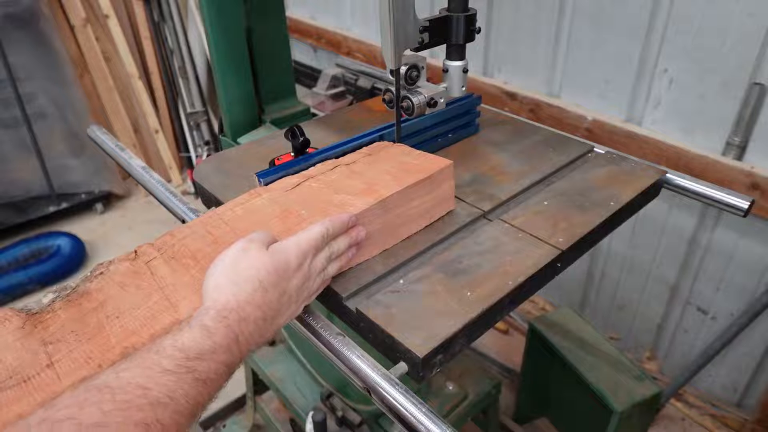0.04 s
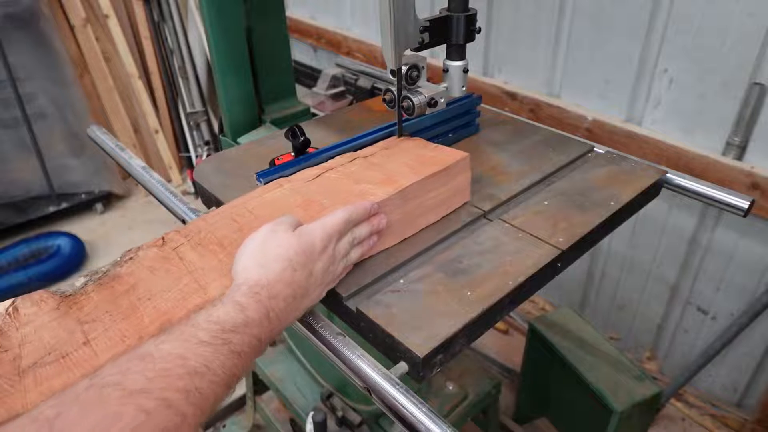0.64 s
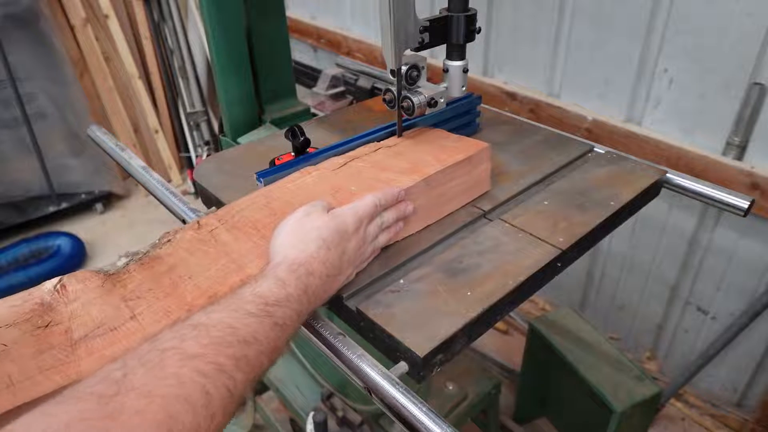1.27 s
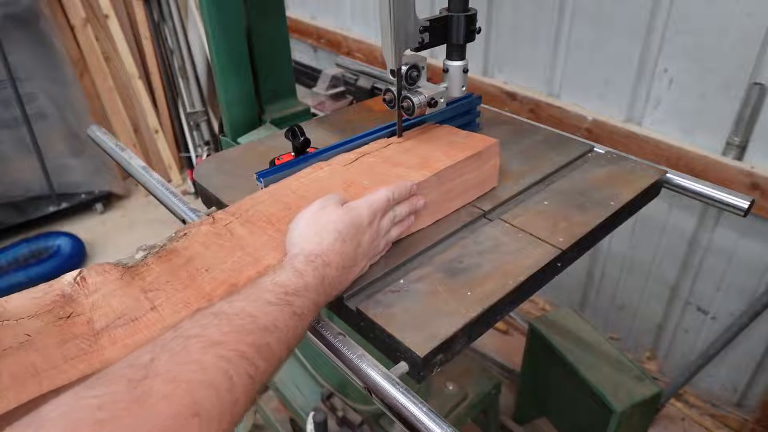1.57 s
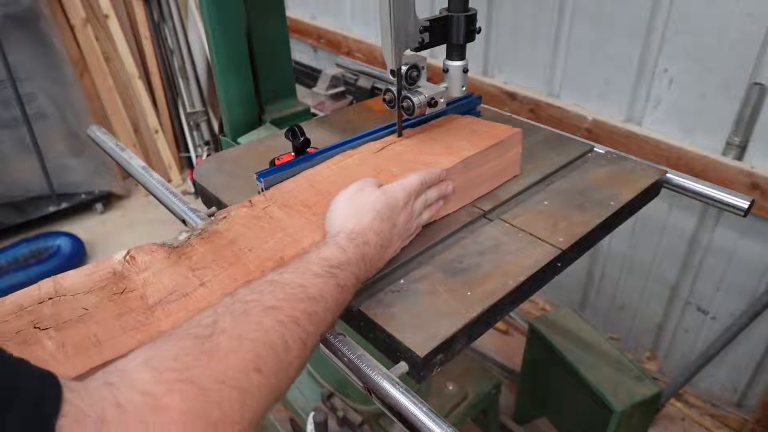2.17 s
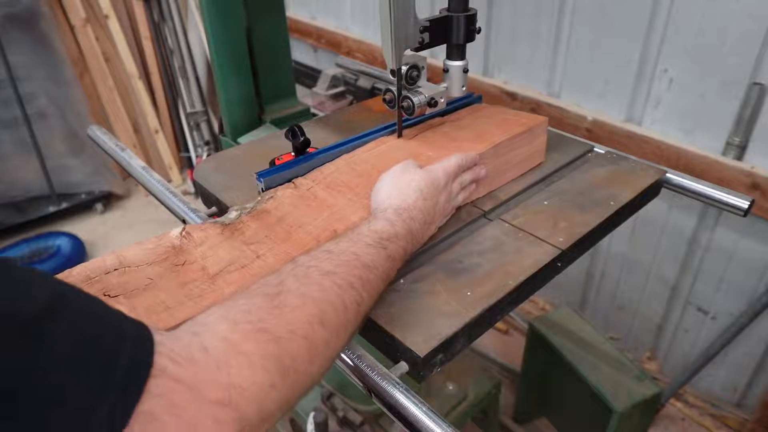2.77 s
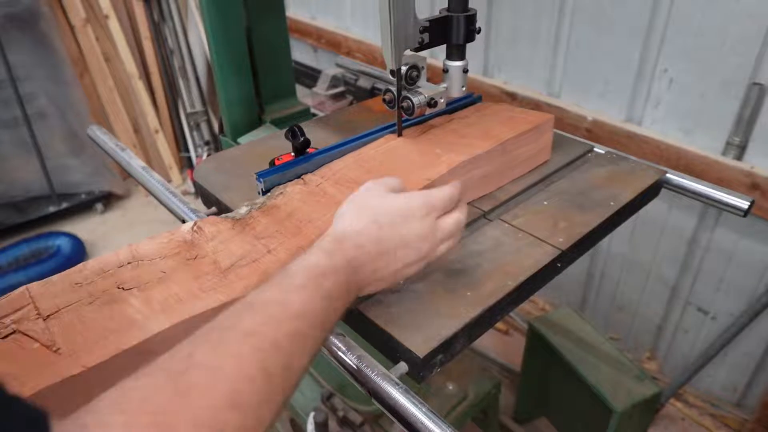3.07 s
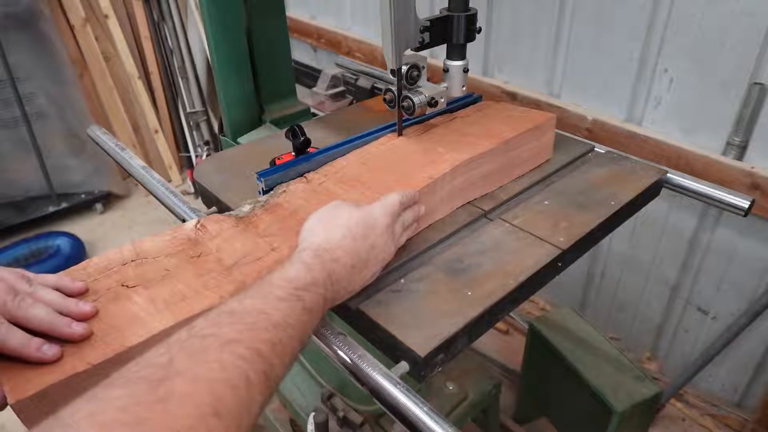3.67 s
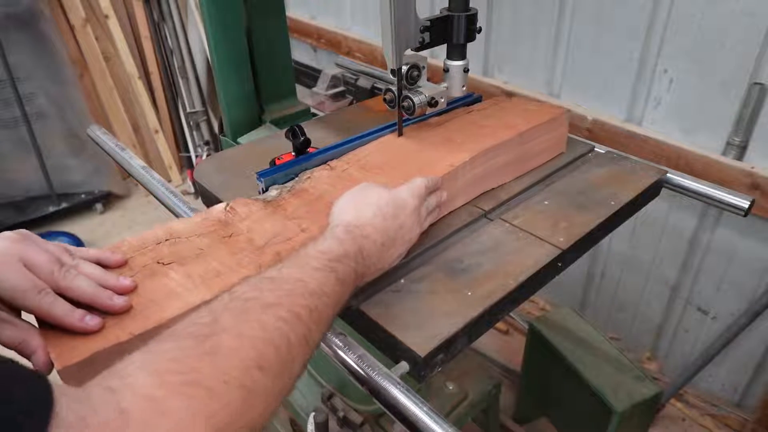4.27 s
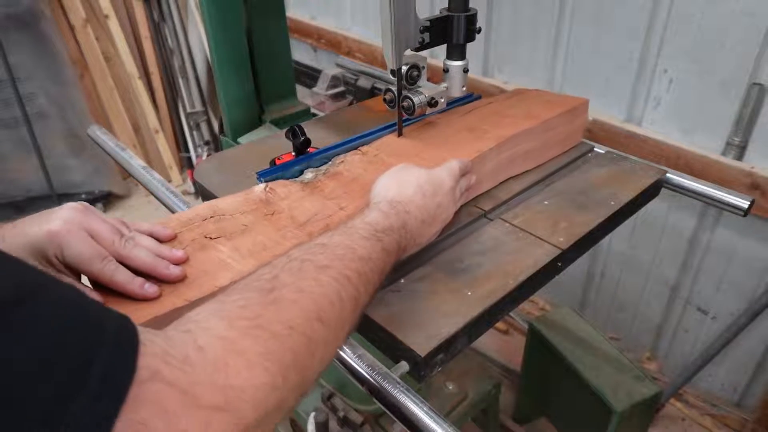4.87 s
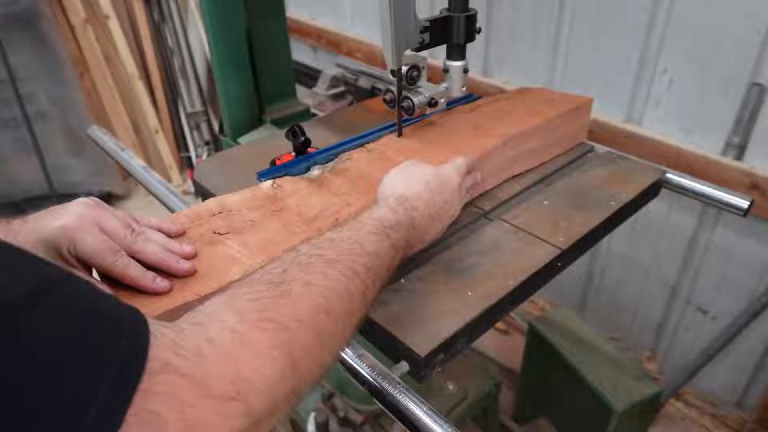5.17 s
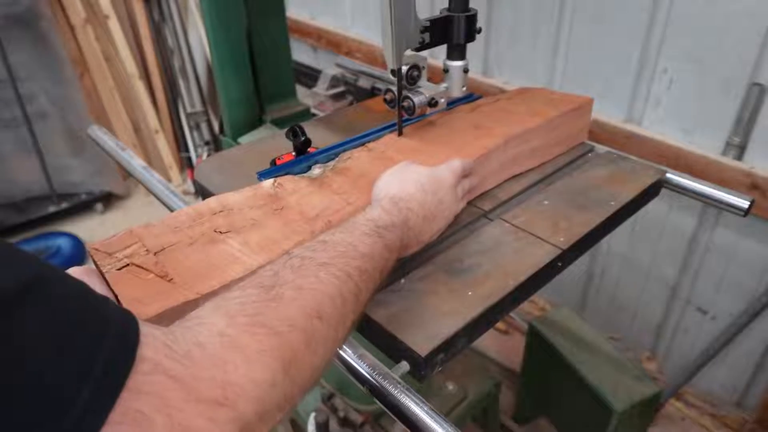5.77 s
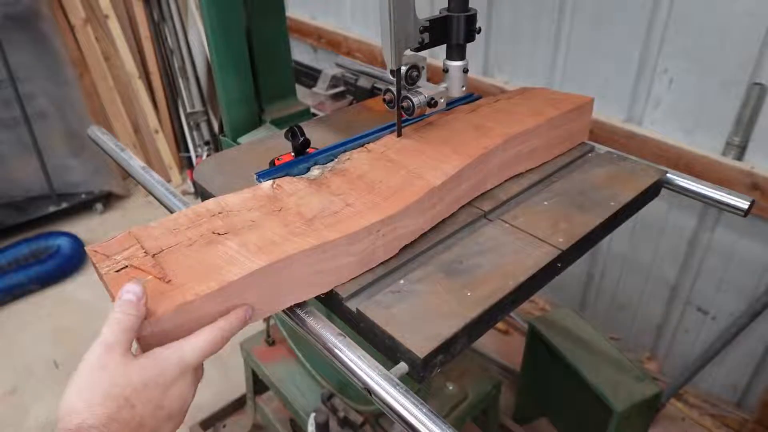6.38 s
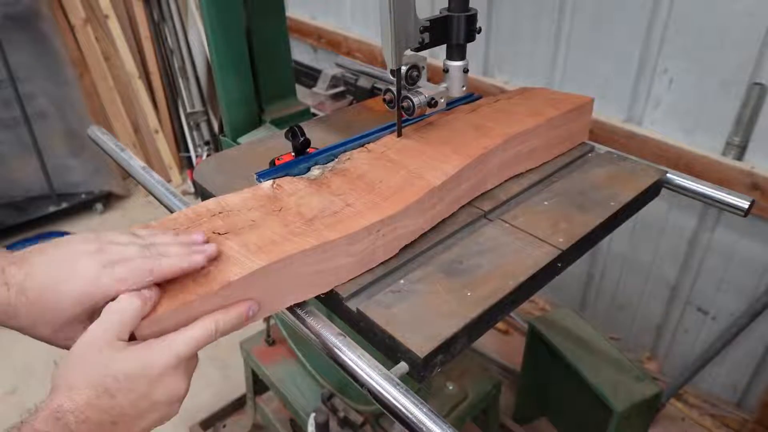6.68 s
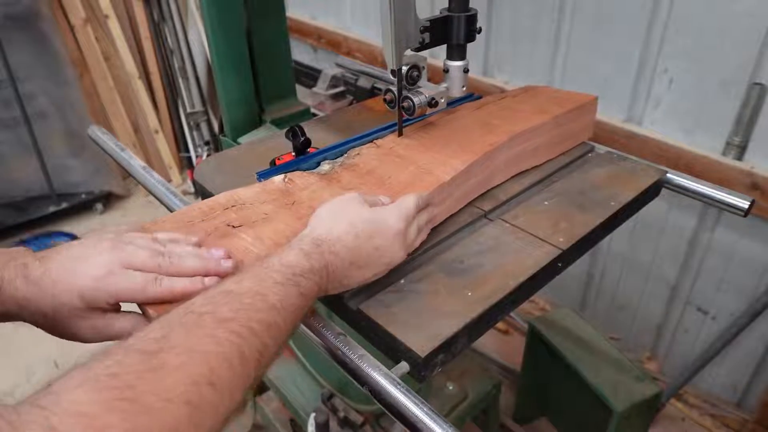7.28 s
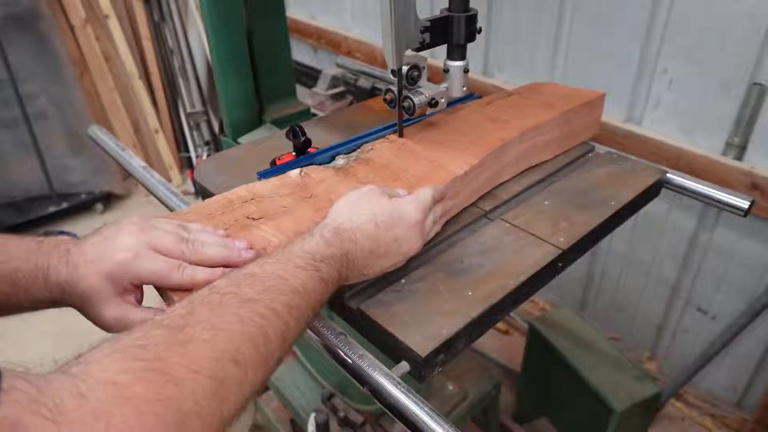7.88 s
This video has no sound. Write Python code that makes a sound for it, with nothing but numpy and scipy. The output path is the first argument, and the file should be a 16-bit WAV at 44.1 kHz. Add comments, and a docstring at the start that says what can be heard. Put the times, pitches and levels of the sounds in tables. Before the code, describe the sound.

Close, rasping noise of a bandsaw cutting thick wood in a small workshop, broken by bouts of shrill blade squeal.

```python
"""Bandsaw ripping a thick board

In a small workshop, the teeth tear out chips and ring blade and frame over the hum of motor and wheels.
In the tight kerf (the slot it cuts) the blade breaks into bouts of throbbing whine, and at times it
sings on overtones of the tooth rate. An automatic gain control holds the level of the mono sound,
so the noise of the cut sinks when the blade whines loudly."""
import sys
import numpy as np
from scipy import signal
from scipy.fft import rfft, irfft, next_fast_len
from scipy.io import wavfile
from scipy.ndimage import uniform_filter1d, minimum_filter1d, map_coordinates

SR = 44100
rng = np.random.default_rng(int(sys.argv[2]) if len(sys.argv) > 2 else 0)


def wrap_up_sound(samples):
    """Save the sound to the file named by the first command line argument, as 16-bit audio."""
    columns = np.atleast_2d(samples).T
    # keep every value between -1 and 1, then stretch to whole-number steps
    tamed = np.clip(columns, -1, 1)
    steps = np.round(tamed * 32767).astype(np.int16)
    wavfile.write(sys.argv[1], SR, steps)


N = 354123
TIME = np.arange(N) / SR

# Levels in the tables are relative. A swell is the change in level from start to end.
# the cut as the board is fed: t/s, growl of board and frame/dB, rasp of teeth/dB, hiss of sawdust/dB
FEED_LEVELS = [(.1, -14, -20.5, -21.5), (.55, -17, -17, -23.5), (1.2, -14, -18, -21),
               (1.4, -19.5, -17, -27.5), (1.85, -15, -17.5, -22), (2.2, -17.5, -18.5, -23),
               (2.55, -15, -17, -21.5), (3.1, -18.5, -23, -27), (3.5, -16, -21.5, -26.5),
               (3.72, -20, -24, -30), (3.82, -15.5, -20, -26.5), (4.85, -16.5, -19.5, -26.5),
               (5.28, -16.5, -22.5, -27), (5.5, -16, -22, -26), (6.55, -13.5, -20.5, -24.5),
               (7.1, -15.5, -19.5, -25.5), (7.85, -17, -25, -27.5), (8.0, -18, -20, -22.5)]
# tone colour of tearing wood: f/Hz, level/dB
WOOD_COLOUR = [(150, -33.5), (300, -23), (420, -16.5), (610, -14), (800, -1), (1150, -5.5), (1400, -0.5),
               (1850, -4.5), (2500, -2.5), (3500, -6), (6000, -9.5), (7700, -13.5), (10500, -13.5),
               (15600, -20)]
# modes (natural ringing pitches) of blade and frame: f/Hz, width/Hz, level/dB
STEEL_MODES = [(782, 25, 2), (840, 40, 2), (1077, 22, 7), (1336, 32, 14), (1378, 26, 8), (1513, 32, 7),
               (2128, 30, 9), (2820, 110, -4), (3150, 30, -1), (3890, 100, -4), (4265, 55, 5),
               (4690, 90, -4), (5075, 25, 0), (5630, 55, 5), (6095, 40, -4), (7060, 50, -7),
               (9140, 130, -10), (14200, 70, -10)]
# the teeth bite harder or softer for a moment: t/s, change/dB
TOOTH_BITES = [(.87, 1.5), (3.63, 2), (5.08, 0.5), (5.43, 4.5), (5.87, 4.5), (6.72, -2.5), (7.69, 3.5)]
# bouts of whine: start/s, end/s, level/dB, swell/dB, f/Hz, glide/Hz, extra pitch at the start/Hz,
# raggedness from 0 to 1, level of the shrill third harmonic/dB
WHINE_BOUTS = [(.24, 1.263, -8.5, 0.5, 3445, -0.5, 220, 0.92, -17.5),
               (1.259, 2.566, -20.5, -9, 3425, -60, 30.5, 0.92, -20),
               (1.94, 2.06, -23, -3, 3397, -0.5, 0, 0.68, -20),
               (2.23, 2.392, -20.5, 2, 3370, -1, 0, .85, -20),
               (2.568, 3.03, -7.5, 2.5, 3457, 81.5, -0.5, 0.78, -14),
               (3.03, 3.153, -14, -15, 3600, 220, 0, 1, -17),
               (3.424, 3.48, -21, 0, 3673, -3, 2.5, 0.85, -18),
               (3.554, 3.615, -10, -5, 3525, 4, 50, 0.82, -12),
               (3.887, 3.943, -3, -13, 3460, 7, 40, 0.43, -14.5),
               (3.988, 4.05, -6.5, -3, 3427, -6, 41, 0.98, -12),
               (4.058, 4.377, -6.5, -8, 3460, 33.5, 2.5, 0.67, -14.5),
               (4.388, 4.54, -5.5, -2, 3442, -22.5, 30, 0.41, -11),
               (4.548, 5.08, -12, -6.5, 3455, -19, -1, .48, -11),
               (6.856, 6.903, -22, -2, 3520, -6, 49.5, .9, -20),
               (6.944, 7.11, -14, 4, 3486, -1, 40.5, 0.84, -18),
               (7.334, 7.619, -19.5, -9, 3488, 1, 28.5, 0.88, -17)]
# the blade slows briefly in hard wood: t/s, drop in tooth rate/Hz
SLOWDOWNS = [(1.02, 14.3), (1.98, 32), (2.32, 17)]
# the blade sings: start/s, end/s, multiple of the tooth rate, level/dB, swell/dB
SONG_BOUTS = [(0.14, 0.3, 3, -24.5, 12), (0.35, 1.13, 3, -22, 5), (1.24, 1.99, 3, -15.5, -0.5),
              (2.33, 2.63, 3, -20, 3), (1.28, 2.03, 4, -29, -4), (5.35, 5.5, 4, -26, 0),
              (5.83, 6.07, 4, -23, -2), (0.96, 0.99, 6, -23, 0), (1.15, 1.5, 6, -39, 0),
              (2.41, 2.79, 6, -22.5, -2), (0.58, 1.48, 9, -33, 3), (1.73, 2.6, 9, -35, -1)]
# tones that sound together in a song on multiple 3: multiple of the tooth rate, level/dB
SONG_OVERTONES = [(3, 1.5), (4, -24), (5, -18), (7, -18), (9, -20)]
# the sides of the teeth scrape the kerf: start/s, end/s, level/dB, swell/dB
SCRAPE_BOUTS = [(1.25, 2.04, -22, 5), (2.22, 2.415, -25.5, -10), (4.07, 5.08, -23.5, 4),
                (6.85, 7.113, -21, 8), (7.33, 7.619, -23, -3)]
# blade modes that the scraping rings: f/Hz, width/Hz, level/dB
SCREECH_MODES = [(4250, 110, -6), (4980, 200, -6), (5500, 300, 0), (6300, 220, -9), (6930, 220, -2),
                 (9800, 600, -14)]
# the blade sizzles in the kerf: start/s, end/s, level/dB
SIZZLE_BOUTS = [(.2, .28, -25), (.88, 1.003, -21), (1.7, 2.12, -27), (2.144, 2.417, -25)]
# the strongest ring of the frame flares up: t/s, level/dB
FRAME_FLARES = [(.17, -17), (2.53, -23.5), (3.38, -24), (3.85, -21), (5.189, -29), (5.5, -13), (6.2, -13),
                (6.92, -13), (7.75, -21)]
# blade modes that ring out while the feed eases: f/Hz, width/Hz, level/dB
EASED_BLADE_MODES = [(1075, 30, -3), (1503, 32, 0), (2080, 90, -10), (2430, 80, -12), (3150, 26, -6)]
# range of rasp that drops as the feed eases: f/Hz of low edge, full from, full to, high edge
RASP_CORNERS = [4230, 5160, 6360, 12000]
# tones of the guide bearings and the running blade: f/Hz, level/dB
GUIDE_TONES = [(1077, -31), (1373, -30), (1502, -31), (2003, -34), (2105, -33), (2557, -37), (2880, -37),
               (2966, -37), (3149, -35), (3811, -37), (3903, -39), (4274, -35), (4727, -41), (4883, -41),
               (5076, -38), (5636, -36), (6099, -41), (7063, -43)]
# hum of motor and wheels: f/Hz, level/dB
MOTOR_TONES = [(140, -65), (177.6, -55), (213, -57), (245, -57), (280, -57), (317, -54.5), (360, -44.5),
               (420, -43), (452, -83), (525, -44), (570, -38.5)]

TOOTH_HZ, LAP_HZ = 1408, 8.7  # teeth passing, and laps of the blade loop, each second
WOBBLE_HZ, FLUTTER_HZ = 69.3, 179
SLOWDOWN_S = .096
RUB_ATTACK_S, RUB_RELEASE_S = .02, .039
EASE_FROM_S, EASE_TO_S, EASE_FADE_S = 6.27, 6.6, .1  # the feed eases while the hands change grip


def sawing(wobble):
    """Tearing fibres sound through the board and ring the steel; the feed sets growl, rasp and dust."""
    hz, db = np.transpose(WOOD_COLOUR)
    chips = tearing(scatter_db=1, pulse=.45, repeat=.52)
    # the board is too small to give off deep bass
    wood = shape(chips, lambda f: undb(slope(f, hz, db)) / (1 + (150 / f) ** 6))
    steel = resonate(tearing(scatter_db=3.5, pulse=.24, repeat=.14), STEEL_MODES)
    cut = unit(wood) + undb(-5.5) * steel
    chatter = undb(.5 * walk(25) + 1.33 * walk(220) + .067 * wobble)

    def band(gains, level_db, flicker_db):
        part = unit(shape(cut, lambda f: slope(f, [2930, 4570, 6150, 11500], gains)))
        return part * undb(level_db + flicker_db * walk(40))

    growl_db, rasp_db, dust_db = curves(FEED_LEVELS)
    bite_db = bumps(TOOTH_BITES, width_s=.03)
    growl = band([1, 0, 0, 0], growl_db - .3, flicker_db=.4)
    rasp = band([0, 1, 1, 0], rasp_db + bite_db + 2, flicker_db=.6)
    dust = band([0, 0, 0, 1], dust_db + .62 * bite_db + 3, flicker_db=1.1)
    return (growl + rasp + dust) * chatter


def tearing(scatter_db, pulse, repeat):
    """Each tooth tears a burst of fibres; the pattern of uneven teeth comes round with every lap."""
    fibres = rng.standard_normal(N) * undb(scatter_db * walk(5000))
    uneven_teeth = np.resize(rng.standard_normal(int(SR / LAP_HZ)), N)
    tooth_phase = turn(TOOTH_HZ * (1 + .02 * walk(200)))
    return (unit(fibres) + repeat * uneven_teeth) * (1 + pulse * np.cos(tooth_phase))


def whine(wobble, scatter_hz=66.8):
    """The blade twists and rubs the kerf; its sideways wobble chops the squeal and bends its pitch."""
    gain, hz, ragged, shrill = whine_controls()
    hz = np.where(gain > 0, hz, np.median(hz[gain > 0]))
    hz -= 3.6 * bumps(SLOWDOWNS, SLOWDOWN_S)  # a slower blade whines lower
    phase = turn(hz + scatter_hz * ragged * (.4 * wobble + walk(380)))
    grip = 1.2 * wobble + .35 * throb(42.5) + .35 * throb(109) + .7 * walk(330)
    bursts = unit(1 + ragged * np.tanh(grip))  # friction limits the swing
    # higher modes of the blade sharpen the overtones
    second = resonate(np.sin(2 * phase + walk(700)), [(6840, 1600, 0)])
    third = resonate(np.sin(3 * phase + .5 * walk(700)), [(10490, 450, 0)])
    squeal = undb(2.5) * np.sin(phase) + undb(-13.5) * second + shrill * third
    low_rumble = undb(-47) * rumble()  # comes and goes with the whine
    return bursts * gain * (squeal + low_rumble)


def whine_controls(settle_s=.14):
    """Gain, pitch, raggedness and shrillness of the whine; a bout that starts high settles down."""
    gain, pitch, raggedness, shrill = np.zeros((4, N))
    for start, end, db, swell_db, hz, glide_hz, sharp_hz, ragged, shrill_db in WHINE_BOUTS:
        envelope = bout(start, end, attack_s=.012, release_s=.03, db=db, swell_db=swell_db)
        gain += envelope
        on = envelope > 0
        age = np.maximum(TIME[on] - start, 0)
        pitch[on] = hz + glide_hz * (age / (end - start) - .5) + sharp_hz * np.exp(-age / settle_s)
        raggedness[on], shrill[on] = ragged, undb(shrill_db)
    return gain, pitch, raggedness, shrill


def song(wobble):
    """Overtones of the tooth rate lock on to the blade; the louder the third, the more they flutter."""
    third, fourth, sixth, ninth = (song_gain(k) for k in (3, 4, 6, 9))
    phase = turn(TOOTH_HZ - bumps(SLOWDOWNS, SLOWDOWN_S) + 1.8 * walk(150))
    shiver = .42 * throb(FLUTTER_HZ) + .36 * throb(187) + .42 * wobble + .25 * walk(300)
    flutter = 1 + (third / third.max()) ** .34 * shiver
    overtones = sum(undb(db + 2 * walk(20)) * np.sin(k * phase) for k, db in SONG_OVERTONES)
    rough = third * undb(3.5) * overtones
    clear = sixth * unit(np.sin(6 * phase + .25 * walk(400)))  # this one does not flutter
    thin = fourth * unit(np.sin(4 * phase + .5 * walk(400)))
    thin += ninth * unit(np.sin(9 * phase + .7 * walk(400)))
    thin *= undb(3.3 * walk(7.2))
    return (rough + thin) * flutter + undb(5.5) * clear


def song_gain(multiple):
    """How strongly the blade sings on one multiple of the tooth rate."""
    return sum(bout(start, end, attack_s=.037, release_s=.072, db=db, swell_db=swell_db)
               for start, end, k, db, swell_db in SONG_BOUTS if k == multiple)


def scrape(wobble):
    """The sides of the teeth rub the wood and make the blade screech."""
    gain = sum(bout(start, end, RUB_ATTACK_S, RUB_RELEASE_S, db, swell_db)
               for start, end, db, swell_db in SCRAPE_BOUTS)
    screech = resonate(tearing(scatter_db=4, pulse=.4, repeat=.3), SCREECH_MODES)
    flutter = 1 + .35 * wobble + .14 * np.cos(turn(FLUTTER_HZ))
    return undb(4.5) * gain * screech * flutter


def sizzle(hz=9800, width_hz=1000):
    """The teeth set a high, broad mode of the blade fizzing."""
    gain = sum(bout(start, end, RUB_ATTACK_S, RUB_RELEASE_S, db) for start, end, db in SIZZLE_BOUTS)
    fizz = resonate(rng.standard_normal(N), [(hz, width_hz, 0)])
    return gain * fizz * unit(undb(4.3 * walk(200)))


def frame_ring(hz=1343, width_hz=28):
    """The strongest ring of the metal frame swells up briefly."""
    gain = bumps([(t, undb(db)) for t, db in FRAME_FLARES], width_s=.029)
    return gain * resonate(rng.standard_normal(N), [(hz, width_hz, 0)])


def ease_off(x, drop_db=-6.5):
    """With little pressure on the teeth, the sharp rasp drops away."""
    easing = bout(EASE_FROM_S, EASE_TO_S, EASE_FADE_S, EASE_FADE_S)
    rasp = shape(x, lambda f: slope(f, RASP_CORNERS, [0, 1, 1, 0]))
    return x - rasp + rasp * undb(drop_db * easing)


def hand_squeak(start_s=6.0, length_s=.064, from_hz=500, to_hz=385, db=-27):
    """A short, low, falling squeak as the hand shifts on the board."""
    slide = np.clip((TIME - start_s) / length_s, 0, 1)
    return undb(db) * np.sin(np.pi * slide) * np.sin(turn(from_hz + (to_hz - from_hz) * slide))


def machine(ring_on_s=.13):
    """Motor, wheels and bearings run steadily; the blade rings while the feed eases and just after."""
    hum = sum(undb(db) * tone(hz, waver_hz=1.44, flicker_db=3) for hz, db in MOTOR_TONES)
    guides = sum(undb(db) * tone(hz, waver_hz=5.96, flicker_db=4) for hz, db in GUIDE_TONES)
    ring_gain = bout(EASE_FROM_S, EASE_TO_S + ring_on_s, EASE_FADE_S, EASE_FADE_S, db=-16)
    ring = ring_gain * resonate(rng.standard_normal(N), EASED_BLADE_MODES)
    return hum * undb(-1.53) + guides * undb(-1) + ring + rumble() * undb(-69 + 5 * walk(16))


def tone(hz, waver_hz, flicker_db):
    """A machine tone that wavers in pitch and strength."""
    return unit(np.sin(turn(hz + waver_hz * walk(45))) * undb(flicker_db * walk(22)))


def rumble():
    """Deep noise, mostly below 130 Hz."""
    return unit(shape(rng.standard_normal(N), lambda f: 1 / (1 + (f / 130) ** 2)))


def workshop(x, decay_s=.2, echo_db=-9):
    """Close sheet-metal walls add a short, dense tail of echoes."""
    t = np.arange(SR // 2) / SR
    tail = rng.standard_normal(len(t)) * undb(-60 * t / decay_s) * (t > .004)
    return x + undb(echo_db) * signal.fftconvolve(x, tail / np.linalg.norm(tail))[:N]


def bout(start, end, attack_s, release_s, db=0, swell_db=0):
    """Gain of one stretch of sound: it rises, holds with a steady swell or fade, and dies away."""
    edges = np.clip(np.minimum((TIME - start) / attack_s, (end - TIME) / release_s) + .5, 0, 1)
    gains = undb(db + swell_db * np.array([-.5, 0, .5]))
    return edges * np.interp(TIME, [start, (start + end) / 2, end], gains)


def bumps(table, width_s):
    """A bell-shaped rise and fall at each (t/s, height)."""
    return sum(height * np.exp(-((TIME - t) / width_s) ** 2) for t, height in table)


def curves(table):
    """The columns of a table, joined by straight lines in time."""
    times, *columns = np.transpose(table)
    return [np.interp(TIME, times, column) for column in columns]


def walk(rate):
    """A smooth random wander with spread 1 and about rate new values a second."""
    knots = rng.standard_normal(N // 8)[:int(rate * N / SR) + 4]
    return 1.164 * map_coordinates(knots, [TIME * rate], order=2, mode="nearest")


def turn(hz):
    """Phase (angle) of something that turns at hz, from a random start."""
    return 2 * np.pi * (np.cumsum(hz * np.ones(N)) / SR + rng.random())


def throb(hz):
    """A swing to and fro whose rate drifts a little around hz."""
    return np.cos(turn(hz + walk(8)))


def resonate(x, modes):
    """Let x ring a set of modes (f/Hz, width/Hz, level/dB); the result has strength 1."""
    def power(f):
        return sum(undb(2 * db) / (1 + (1.8 * (f - hz) / width) ** 2) ** 2 for hz, width, db in modes)
    return unit(shape(x, lambda f: np.sqrt(power(f))))


def shape(x, gain):
    """Filter x by a gain that depends on frequency."""
    size = next_fast_len(N + 8192)
    hz = np.maximum(np.fft.rfftfreq(size, 1 / SR), 1)
    return irfft(rfft(x, size) * gain(hz), size)[:N]


def slope(f, hz, values):
    """Join values by straight lines on an axis of octaves."""
    return np.interp(np.log(f), np.log(hz), values)


def undb(db):
    """Decibels to gain."""
    return 10 ** (np.asarray(db) / 20)


def unit(x):
    """Scale to an average strength (rms) of 1."""
    return x / np.sqrt(np.mean(np.abs(x) ** 2))


def scene():
    """The saw in its room, the same in both channels."""
    wobble = np.cos(turn(WOBBLE_HZ + 1.12 * walk(20)))  # the blade swings sideways
    cut = workshop(sawing(wobble) + whine(wobble) + scrape(wobble) + sizzle() + frame_ring())
    saw = ease_off(cut + song(wobble) + machine())
    return np.tile(saw + hand_squeak(), (2, 1))


def record(dry, hold_db=-12, ratio=9.6, react_s=.011, ceiling=.78, top_hz=15750):
    """A gain control turns loud passages down, a limiter holds the peaks, and the top treble is cut."""
    memory = np.exp(-1 / (react_s * SR))
    level = np.sqrt(signal.lfilter([1 - memory], [1, -memory], dry[0] ** 2))
    held = dry / np.maximum(1, level / undb(hold_db)) ** (1 - 1 / ratio)
    limiter = np.minimum(1, ceiling / (np.abs(held[0]) + 1e-9))
    limiter = uniform_filter1d(minimum_filter1d(limiter, size=120), size=120)  # glide around each peak
    lowpass = signal.ellip(10, .05, 50, top_hz, fs=SR, output="sos")
    return signal.sosfiltfilt(lowpass, held * limiter)


dry = scene()
out = record(dry)
wrap_up_sound(out)
```